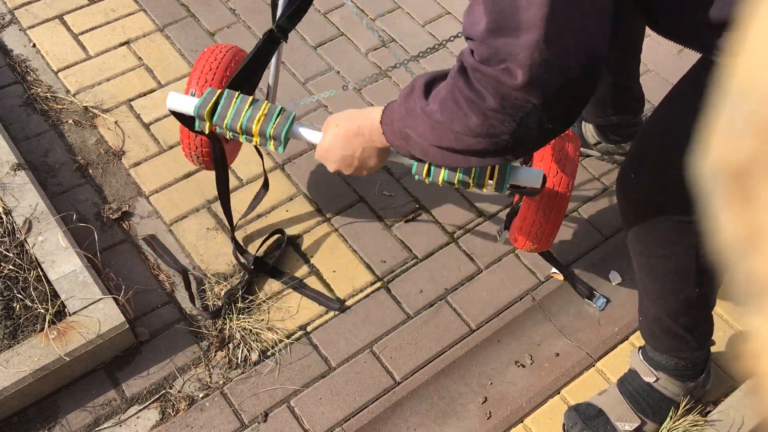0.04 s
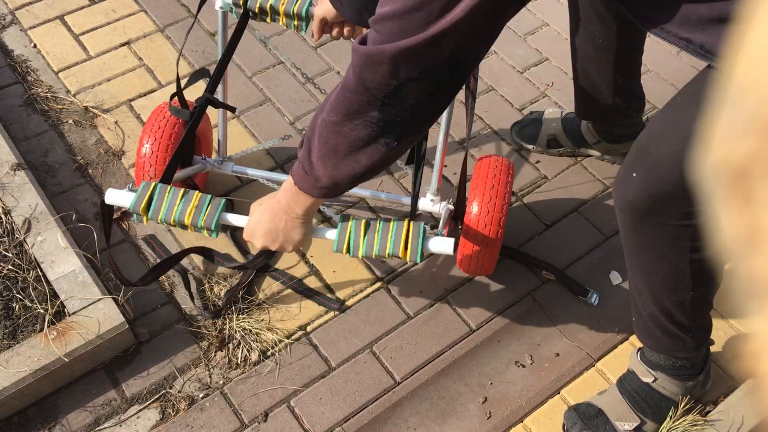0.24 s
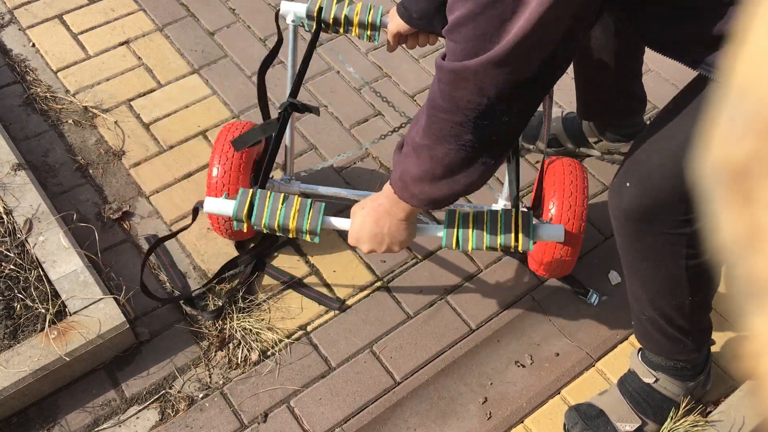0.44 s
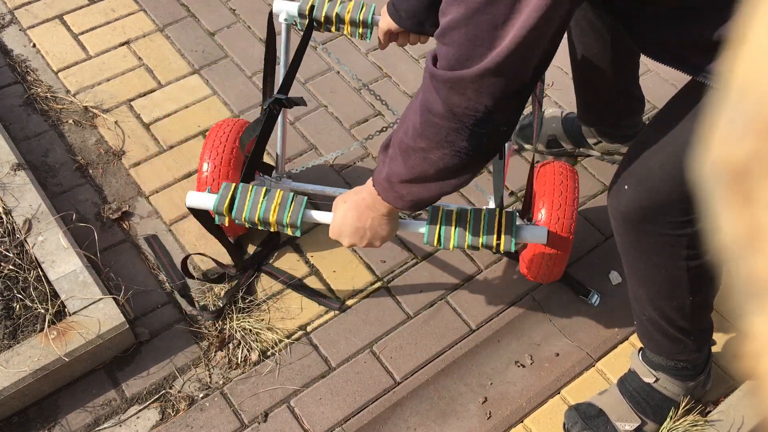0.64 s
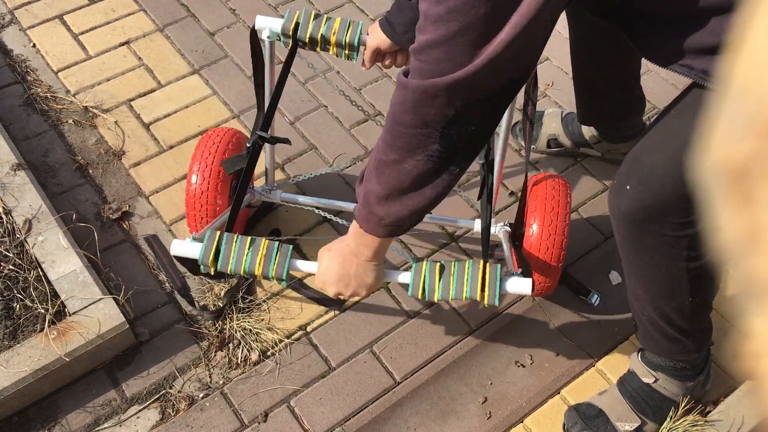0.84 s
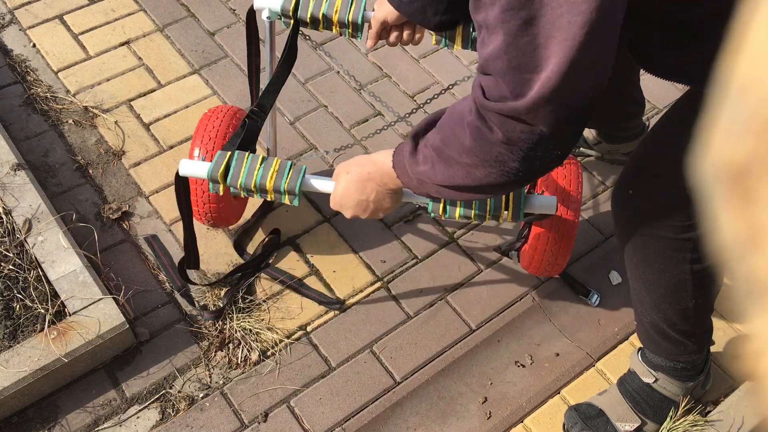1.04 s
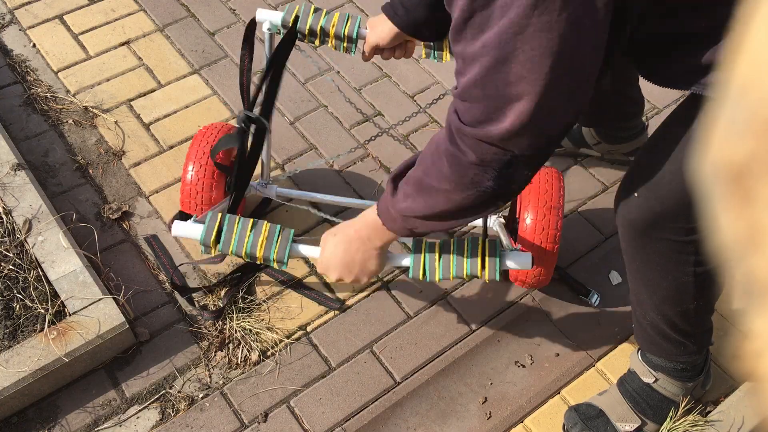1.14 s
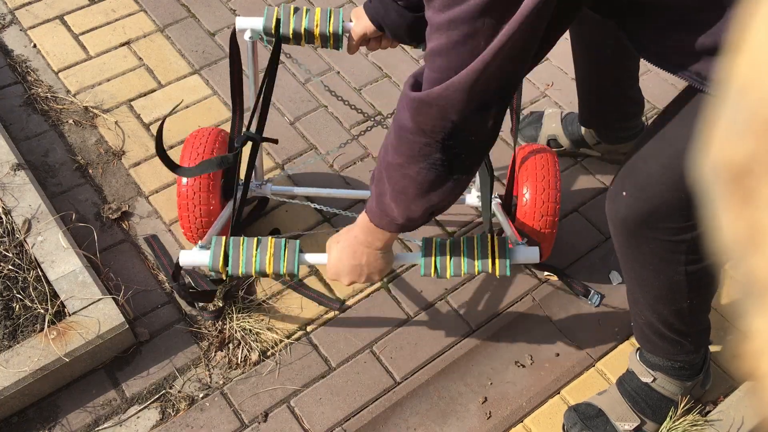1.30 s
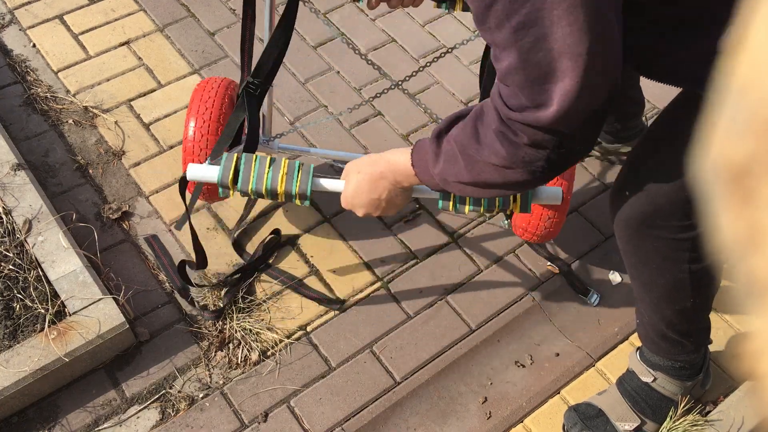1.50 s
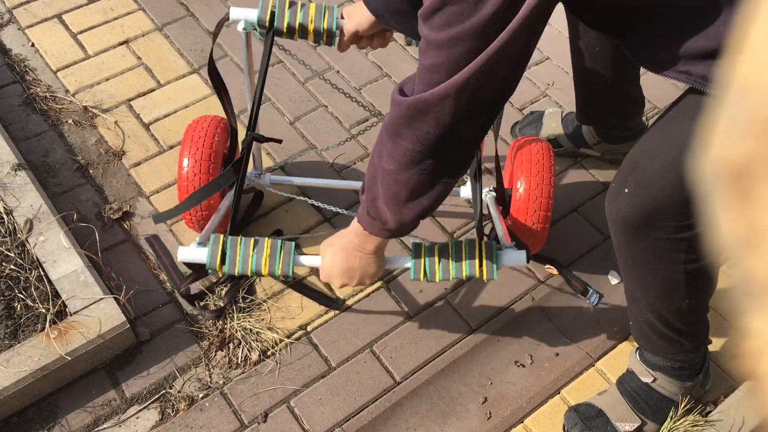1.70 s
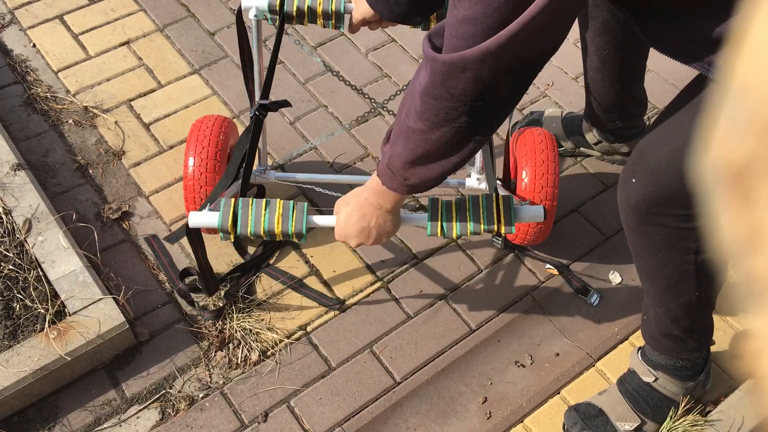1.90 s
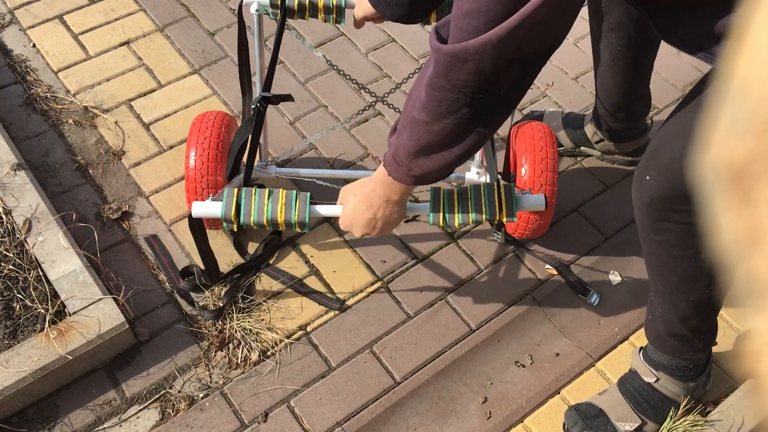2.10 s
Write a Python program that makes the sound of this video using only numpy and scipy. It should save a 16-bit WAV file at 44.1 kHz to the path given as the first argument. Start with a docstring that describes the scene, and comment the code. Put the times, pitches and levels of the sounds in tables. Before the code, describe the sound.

A metal cart is shaken close by, its loose tubes clattering in quick bursts at about 0.2, 0.5, 1.2 and 1.7 seconds. The first three carry a low thump. Between the shakes, steel strap buckles give thin, high clinks and parts scuff softly, with the last clinks fading by about 2.1 seconds. A low, uneven rumble of handling and light outdoor wind runs underneath.

```python
"""A folding metal cart is shaken four times over paving. Each shake slams its loose tube joints in a quick
cluster of knocks and may thump the frame; in between, steel strap buckles clink and jingle and
the parts scuff against each other. Handling and light wind rumble underneath, outdoors."""
import sys
import numpy as np
from scipy import signal
from scipy.fft import rfft, irfft, next_fast_len
from scipy.io import wavfile

SR = 44100
rng = np.random.default_rng(int(sys.argv[2]) if len(sys.argv) > 2 else 0)


def unload_wav(signal):
    """Save mono or channel-first audio to the path in sys.argv[1] as 16-bit WAV at rate SR, clipped to [-1, 1]."""
    wavfile.write(
        sys.argv[1],
        SR,
        np.round(np.clip(np.atleast_2d(signal).T, -1, 1) * 32767).astype(np.int16),
    )


N = 94815

# joint knocks: (s, body dB, bright edge dB)
KNOCKS = [(.213, -21, -21.5), (.215, -20, -14.5), (0.2237, -23, -18), (.236, -27, -19), (0.2411, -32, -24.5), (.248, -30, -40), (0.257, -35, -23), (.267, -29, -23.5), (0.283, -36.5, -34), (.294, -38.5, -29), (.311, -42, -34.5),
          (0.499, -50, -24.5), (0.504, -34, -32), (0.5098, -31.5, -23.5), (0.521, -20.5, -19.5), (0.525, -30.5, -29), (0.53, -35, -47), (0.538, -46, -24), (.546, -28.5, -22.5),
          (1.233, -26.5, -44), (1.237, -26, -16.5), (1.2477, -22, -20), (1.2513, -26, -15.5), (1.2579, -36, -23), (1.262, -35, -22.5), (1.267, -36, -20.5), (1.273, -33, -24), (1.277, -28.5, -44),
          (1.6801, -26, -28.5), (1.6884, -23, -23.5), (1.6993, -21.5, -23), (1.707, -37, -14), (1.7097, -27.5, -18), (1.715, -23, -15.5), (1.722, -32, -38), (1.728, -30, -29), (1.736, -33.5, -45), (1.7419, -29.5, -36)]
# buckle clinks: (s, steel dB, dB passed into the frame, length factor)
CLINKS = [(.081, -40, -46.5, 1.17), (.358, -37, -49, 1.24), (.402, -27.5, -38, 0.67), (.441, -38, -42, 1.3), (0.5896, -24.5, -34, 0.83), (.623, -38.5, -40.5, .9), (.668, -36.5, -43, 1.8),
          (.795, -37.5, -46, 0.97), (0.8372, -38, -46.5, 0.85), (0.904, -43, -48, 0.64), (0.939, -40, -40, 0.082), (1.028, -35.5, -49.5, .9), (1.154, -44.5, -46, 0.68), (1.1876, -33.5, -66, 0.21),
          (1.3497, -25, -39.5, 1.17), (1.38, -28, -42, 1), (1.424, -28.5, -42, 0.61), (1.429, -28, -37, 0.85), (1.471, -46, -57, 2.2), (1.6154, -38, -57, .2),
          (1.7814, -26.5, -43, 1.2), (1.803, -29.5, -53, 0.44), (1.837, -33.5, -49, 0.85), (1.88, -40, -50.5, 1.6), (1.897, -43.5, -54, 1.6), (1.935, -45, -49.5, 0.95), (1.9625, -50, -44.5, 0.3), (1.984, -40, -51, 0.75), (2.066, -48.5, -56, 1.5)]
# thumps of the whole frame on its tyres: (s, pitch Hz, dB, t60 s)
THUMPS = [(0.217, 76, -15, 0.071), (0.516, 150, -24, 0.07), (1.234, 165, -20.5, 0.07), (1.246, 168, -19, .06), (2.073, 121, -32, 0.06)]  # fixed
# soft hollow taps before a shake: (s, pitch Hz, dB)
TAPS = [(.177, 670, -44.5), (1.176, 820, -38.5), (1.193, 686, -46.5), (1.543, 630, -51), (1.661, 880, -40)]
TAP_T60 = 0.024
# spectra: (Hz, dB per Hz)
BODY = [(40, -43), (90, 3), (170, 3), (400, -3), (800, -2.5), (1300, -6.5), (1750, -14.5), (2300, -10), (3200, -8.5), (5000, -14.5), (9000, -19), (16000, -31)]
EDGE = [(300, -36), (1500, 1.5), (3600, -11), (5000, -13), (6200, 3), (8200, -5.5), (10300, -5.5), (11300, 0.5), (15500, 4.5)]
BUCKLE = [(500, -13), (2500, -6.5), (4900, -13), (6700, -3.5), (8200, -15), (10500, -3.5), (11100, -6.5), (13200, -1), (15500, 2.5)]
RATTLE = [(60, -26), (200, 6.5), (700, -7), (1800, -3), (2800, 7.5), (4500, -4), (9000, 4), (16000, -23)]
AIR = [(25, -3), (55, 0), (150, 12.5), (400, 4), (1200, 13.5), (3000, -34), (8000, -57.5), (15500, 4.5)]
RUMBLE = [(20, -41), (38, 3), (54, 2.5), (80, -2), (120, -9), (200, -18.5), (400, -31), (1200, -73)]
# ring of the tubes: (Hz, t60 s)
FRAME_T60 = [(100, 0.17), (500, 0.17), (2500, 0.15), (6000, 0.1), (14000, 0.098)]
BUCKLE_T60 = [(300, 0.41), (3000, 0.13), (8000, 0.022), (12000, 0.034)]
# modes: (Hz, dB, t60 s)
TUBE_MODES = [(233.5, 2.5, 0.23), (385, -6, 0.27), (458.7, 2, 0.17), (551, -8, 0.37), (698.4, -2, 0.078), (862, -21, 0.058), (1314, 1, 0.043), (1358, 0.5, 0.15), (2235, -20, 0.053), (2480, -1, 0.15), (2586, -4, 0.041)]
# ring of the buckles: (Hz, dB, t60 s)
STEEL_MODES = [(10940, -2, .15), (11110, 0, .16), (11390, 3, .18), (11540, -2, .14), (11900, -2, .15), (12530, -5, .12), (13450, -3, .13), (14500, -5, .14), (14923, 0, .16), (15230, -1, .13)]  # fixed
# scuffing of loose parts: (s, dB)
SCUFF = [(0, -57.5), (.16, -68), (.18, -46), (.3, -55), (.35, -59.5), (.48, -53.5), (.5, -33), (.6, -54), (.73, -50), (.79, -49), (.86, -55.5), (1, -58), (1.04, -47.5), (1.13, -61.5), (1.4, -51), (1.6, -61.5), (1.9, -53.5), (2.15, -61)]
# jingling of the buckles: (s, dB)
JINGLE = [(0, -82), (.16, -53), (.2, -40), (.3, -35), (.34, -71), (.47, -50), (.65, -48), (.7, -39.5), (.81, -38), (.88, -73), (1.4, -70), (1.52, -51), (1.6, -65), (2.15, -58)]
# level of the bass rumble: (s, dB)
BASS = [(0, -48), (.17, -64), (.24, -34), (.32, -33), (.43, -54), (.48, -50), (.53, -38), (.6, -46.5), (.72, -55), (.8, -39.5), (.88, -54.5), (.97, -44), (1.08, -48), (1.14, -41), (1.2, -48), (1.26, -32), (1.34, -35.5), (1.42, -56), (1.56, -56), (1.71, -34.5), (1.83, -42.5), (2, -44), (2.08, -34.5), (2.15, -38.5)]
AIR_DB = -63
RING_S = .3  # fixed
TOP_HZ = 15750  # fixed
# hard clanks of the tubes: (s, pitch factor, dB)
CLANKS = [(0.2127, 1.02, -21), (.2365, 1.06, -34), (0.5102, 1, -24), (.5217, 0.99, -22.5), (1.2758, 1.1, -28.5), (1.7, 1.2, -29), (1.722, 1.6, -28)]
# ring of a clanking tube: (Hz, dB, t60 s)
CLANK_MODES = [(2210, -2, .04), (2350, 0, .032), (3850, -8, .02), (6000, -8, .025)]  # fixed
PITCH_SCATTER = .004  # fixed
LOW_CUT_HZ = 55.4
# the thin tube that the buckles hit: (Hz, dB, t60 s)
STRUCK_TUBE_MODES = [(1427, -3, .18), (2444, -3, .18), (2610, 0, .12), (3165, -1, .14), (3526, -2, .14), (5292, -6, .12), (6250, -3, .12), (6858, -1, .12)]  # fixed
TUBE_DB, STEEL_DB, EDGE_RING_DB, STRUCK_TUBE_DB = -21, -25.5, -22, -11
# level of the tubes rubbing between the second and third shakes: (s, dB)
RUB = [(.55, -66), (.62, -43), (.7, -63), (.79, -41), (.85, -51.5), (.92, -75)]
# colour of scuffing: (Hz, dB per Hz)
SCRAPE = [(80, 1), (400, -0.5), (1300, -5), (2800, -6.5), (4700, -13.5), (6500, -13), (15000, -16.5)]
FREE_RING_DB = -11.5  # fixed
MODE_SCATTER_DB = 3.5  # fixed
RUB_COLOUR = [(130, -10), (255, 3), (410, -16), (490, 10), (570, -15), (1020, -7), (1700, -28)]  # fixed
SHIMMER = [(1.4, -70), (1.48, -50), (1.58, -72), (1.8, -56), (1.89, -46), (1.96, -55), (2.08, -53), (2.15, -61)]  # fixed
STRUCK_SCATTER = .015  # fixed


def amp(db):
    """Decibels to gain."""
    return 10 ** (np.asarray(db) / 20)


def unit(x):
    """Scale to rms 1."""
    return x / np.sqrt(np.mean(x ** 2) + 1e-20)


def along(points, hz):
    """(Hz, value) points read on a log axis."""
    f, v = np.transpose(points)
    return np.interp(np.log(hz + 1), np.log(f + 1), v)


def level(rows):
    """Gain per sample from (s, dB) rows."""
    return amp(np.interp(np.arange(N) / SR, *np.transpose(rows)))


def noise(spectrum, size):
    """Coloured noise of rms 1."""
    return unit(irfft(rfft(rng.standard_normal(size)) * amp(along(spectrum, np.fft.rfftfreq(size, 1 / SR))), size))


def add(out, s, sound):
    """Mix a sound in at time s."""
    part = out[max(0, round(s * SR)):][:len(sound)]
    part += sound[:len(part)]


def ring_time():
    """Time axis of one contact."""
    return np.arange(int(RING_S * SR)) / SR


def ring(modes, stretch=1, pitch=1):
    """Decaying modes, excited differently by every blow."""
    t = ring_time()
    return sum(amp(db + rng.normal(0, MODE_SCATTER_DB) - 60 * t / (t60 * stretch)) * np.sin(2 * np.pi * (hz * pitch * (1 + PITCH_SCATTER * rng.normal()) * t + rng.random())) for hz, db, t60 in modes)


def contact(spectrum, decay, crack_s, tail_db, stretch=1):
    """A sharp crack and a dense ring that dies band by band."""
    t = ring_time()
    hz, at, z = signal.stft(noise(spectrum, len(t)), SR, nperseg=128)  # fixed
    tail = signal.istft(z * amp(-60 * at / (stretch * along(decay, hz)[:, None])), SR)[1][:len(t)]
    return noise(spectrum, len(t)) * amp(-60 * t / (crack_s * stretch)) + amp(tail_db) * tail


def patter(spectrum, per_s, spread_db, life_s):
    """Many tiny random contacts, rms 1."""
    hits = (rng.random(N) < per_s / SR) * amp(spread_db * np.clip(rng.standard_normal(N), -2, 2))
    power = signal.fftconvolve(hits ** 2, amp(-120 * ring_time() / life_s))[:N]  # fixed
    return unit(np.sqrt(np.abs(power)) * noise(spectrum, N))


def joints():
    """Loose joints slam: the tubes ring dully under a bright metal-on-metal edge."""
    out = np.zeros(N)
    for s, body_db, edge_db in KNOCKS:
        body = contact(BODY, FRAME_T60, crack_s=0.017, tail_db=-8) + amp(TUBE_DB) * ring(TUBE_MODES)
        edge = contact(EDGE, FRAME_T60, crack_s=.015, tail_db=-8) + amp(EDGE_RING_DB) * ring(STEEL_MODES, stretch=.28)  # fixed
        add(out, s, amp(body_db + 2.5) * body + amp(edge_db + 2) * edge)
    return out


def buckles():
    """Buckles strike the tubes: a dry, very high ping whose pitch shifts with the point of contact."""
    out, t = np.zeros(N), ring_time()
    for s, steel_db, frame_db, length in CLINKS:
        pitch = 1 + STRUCK_SCATTER * rng.normal()
        ping = amp(FREE_RING_DB) * ring(STEEL_MODES, stretch=.4 * length, pitch=pitch)  # fixed
        steel = contact(BUCKLE, BUCKLE_T60, crack_s=0.058, tail_db=-5.5, stretch=length) + ping
        frame = contact(RATTLE, BUCKLE_T60, crack_s=0.056, tail_db=-5.5, stretch=length) + amp(STRUCK_TUBE_DB) * ring(STRUCK_TUBE_MODES, length, pitch)
        add(out, s, (amp(steel_db + 2.5) * steel + amp(frame_db) * frame) * (1 - np.exp(-t / .0003)))  # fixed
    return out


def thumps():
    """Low bounces of the frame and soft hollow taps."""
    out, t = np.zeros(N), ring_time()
    for s, hz, db, t60 in THUMPS:
        add(out, s, amp(db + 7.0 - 60 * t / t60) * np.sin(2 * np.pi * hz * t) * (1 - np.exp(-t / 0.0042)))
    for s, hz, db in TAPS:
        hollow = noise([(hz / 2, -30), (hz, 0), (hz * 2, -30)], len(t))
        add(out, s, amp(db + 5.5 - 60 * t / TAP_T60) * hollow * (1 - np.exp(-t / 0.00088)))
    return out


def loose_parts():
    """Scuffs, a low rub and a fine jingle go on while the cart moves; swinging buckles tap and ring."""
    scuff = patter(SCRAPE, per_s=700, spread_db=3, life_s=.035)  # fixed
    rub = patter(RUB_COLOUR, per_s=900, spread_db=2, life_s=.04)  # fixed
    jingle = patter(BUCKLE, per_s=280, spread_db=3.5, life_s=.03)  # fixed
    return level(SCUFF) * scuff + level(RUB) * rub + level(JINGLE) * jingle + level(SHIMMER) * resonate(jingle, STEEL_MODES, stretch=.3)  # fixed


def outdoors():
    """Low rumble of handling and wind over quiet open air."""
    return level(BASS) * noise(RUMBLE, N) + amp(AIR_DB) * noise(AIR, N)


def clanks():
    """A tube is struck hard and gives a short, pitched clack in the upper middle."""
    out = np.zeros(N)
    for s, pitch, db in CLANKS:
        add(out, s, amp(db) * ring(CLANK_MODES, pitch=pitch) * (1 - np.exp(-ring_time() / .0004)))  # fixed
    return out


def resonate(x, modes, stretch):
    """The ring that many small contacts keep up in a set of modes, rms 1."""
    return unit(signal.fftconvolve(x, ring(modes, stretch))[:N])


def scene():
    """All sources at one close microphone."""
    return (joints() + clanks() + buckles() + thumps() + loose_parts() + outdoors())[None]


def record(dry):
    """The recorder cuts the deepest bass and keeps nothing above its band limit."""
    size = next_fast_len(N + SR // 2)
    gain = 1 / np.sqrt(1 + (np.fft.rfftfreq(size, 1 / SR) / TOP_HZ) ** 400)  # fixed
    thinned = signal.sosfilt(signal.butter(2, LOW_CUT_HZ, "highpass", fs=SR, output="sos"), dry)
    return irfft(rfft(thinned, size) * gain, size)[:, :N]


dry = scene()
out = record(dry)
unload_wav(out)
```